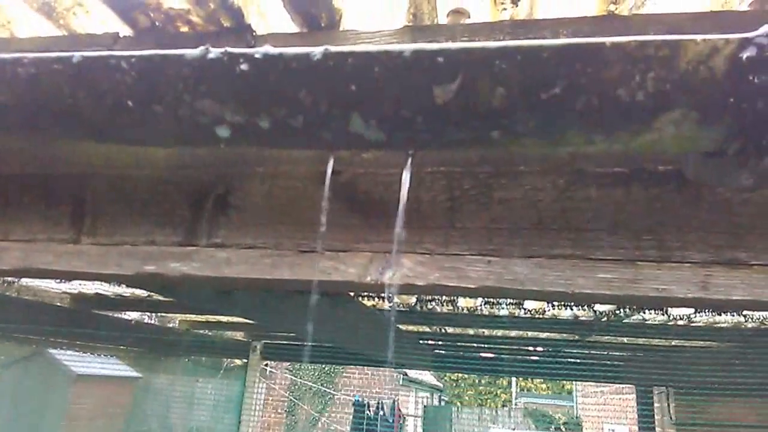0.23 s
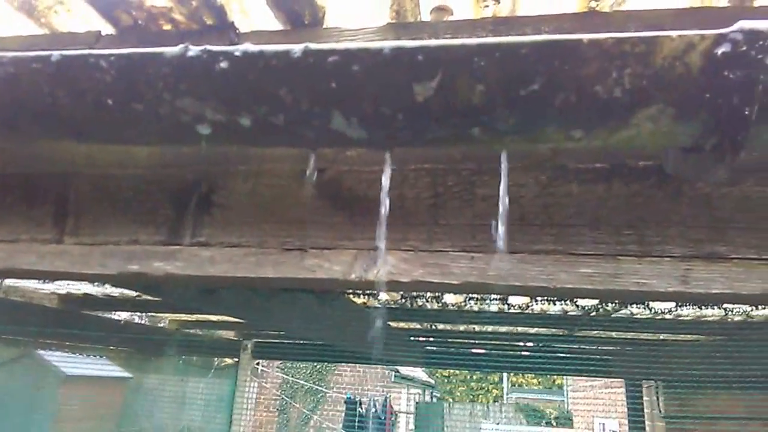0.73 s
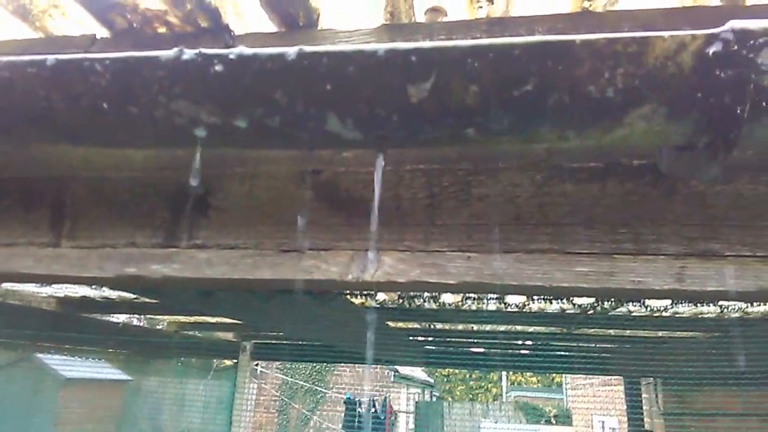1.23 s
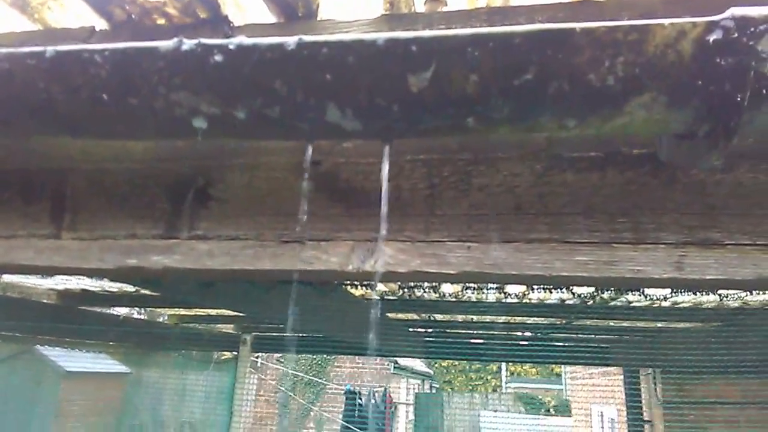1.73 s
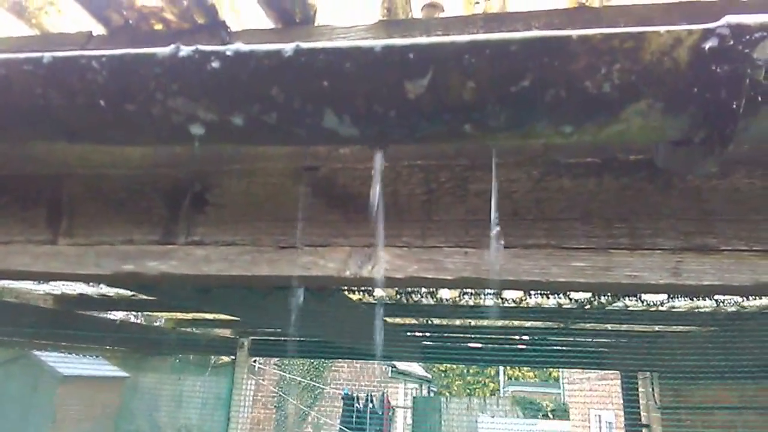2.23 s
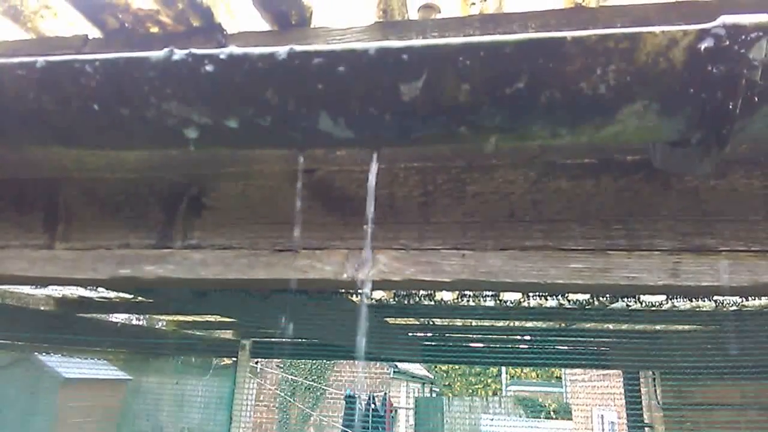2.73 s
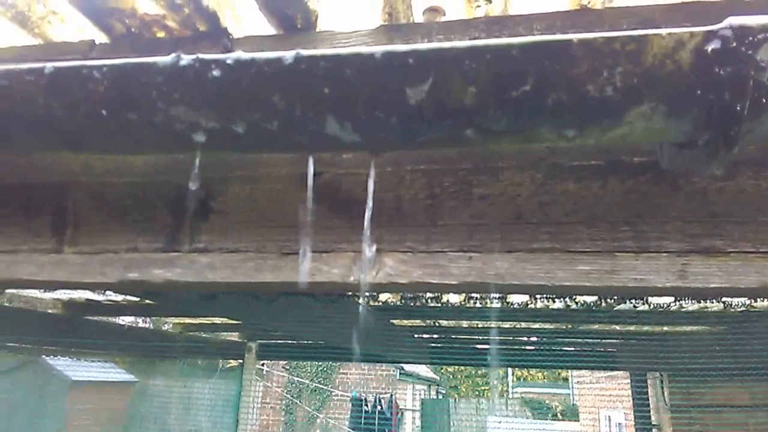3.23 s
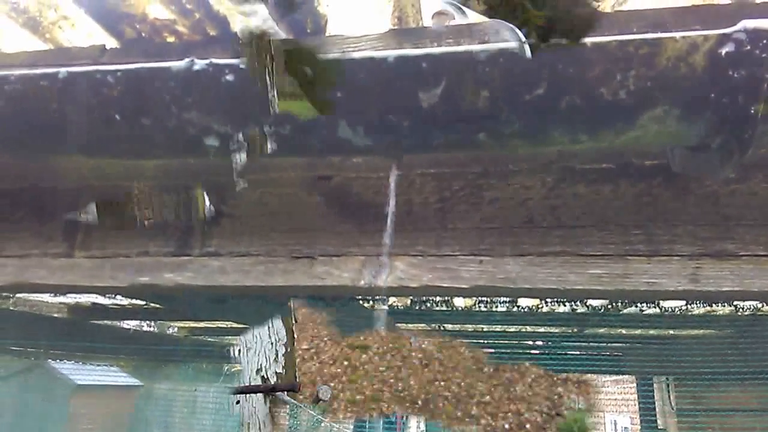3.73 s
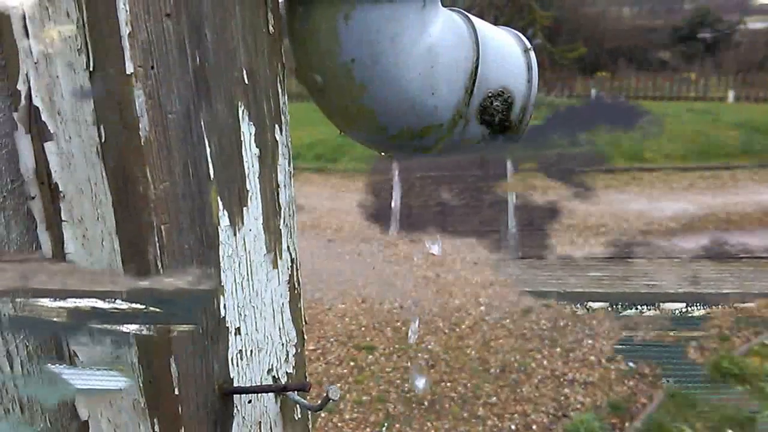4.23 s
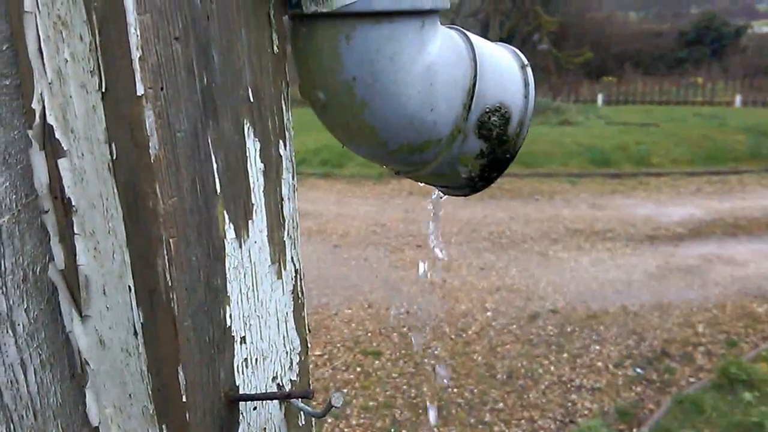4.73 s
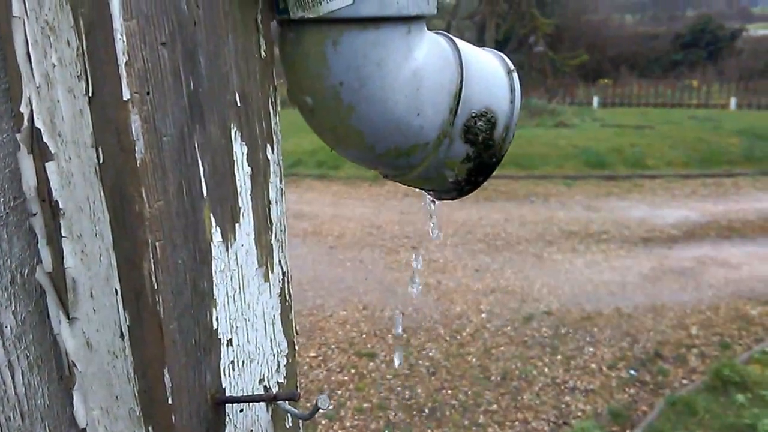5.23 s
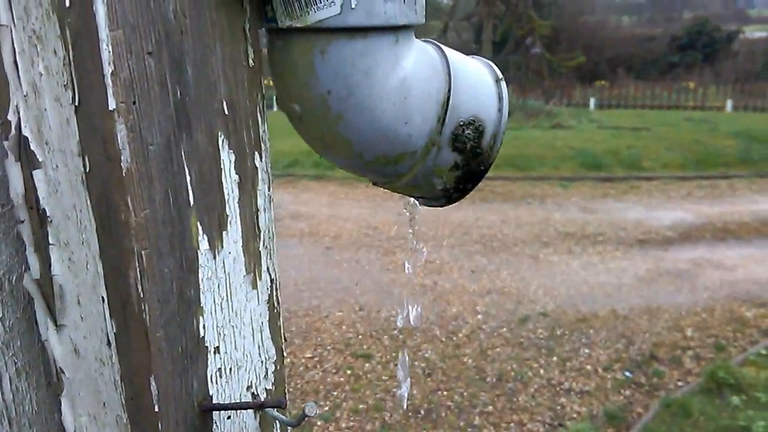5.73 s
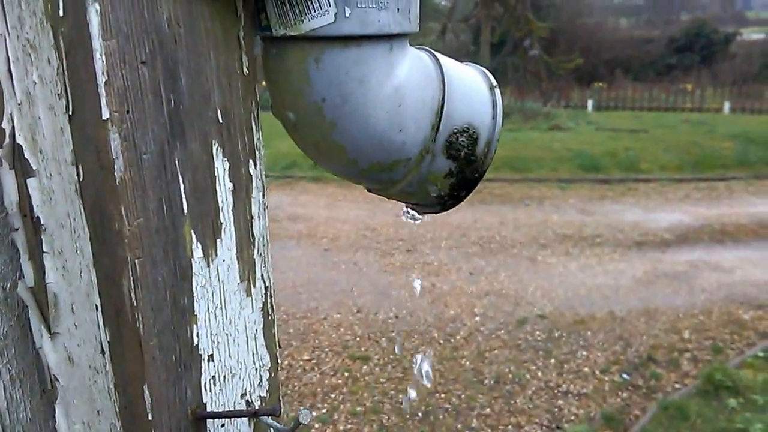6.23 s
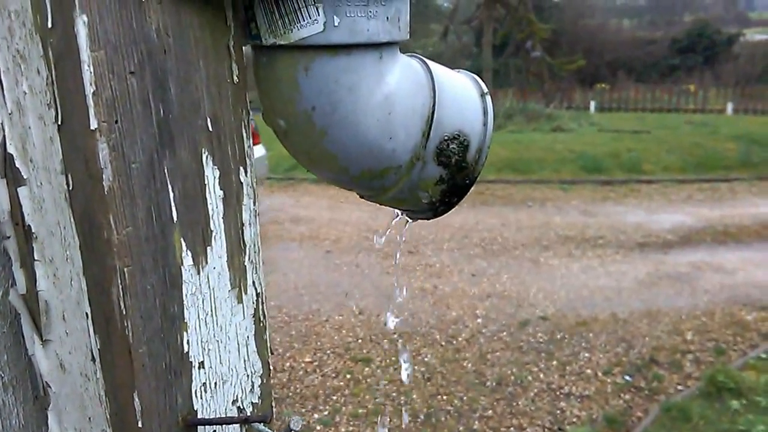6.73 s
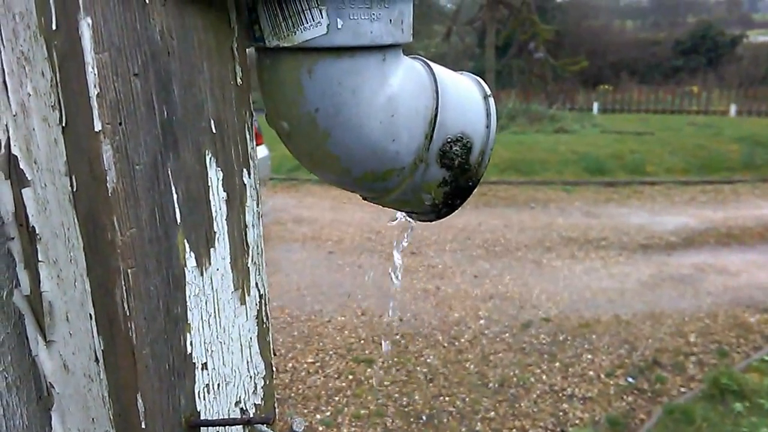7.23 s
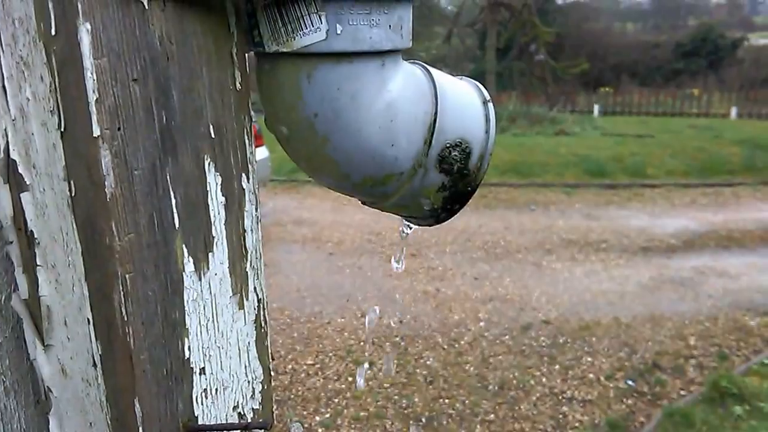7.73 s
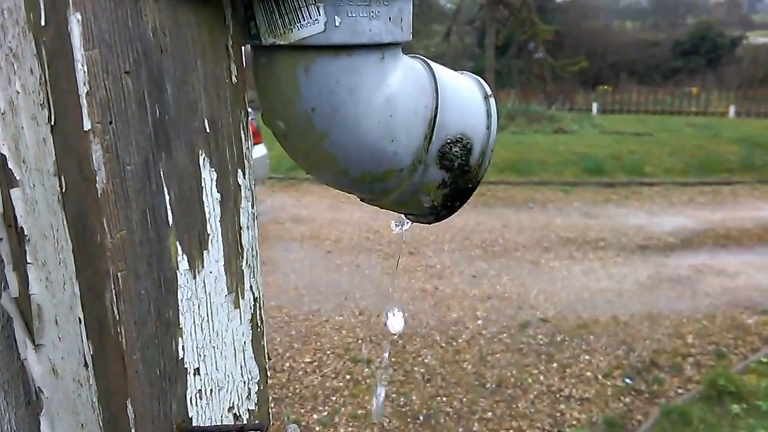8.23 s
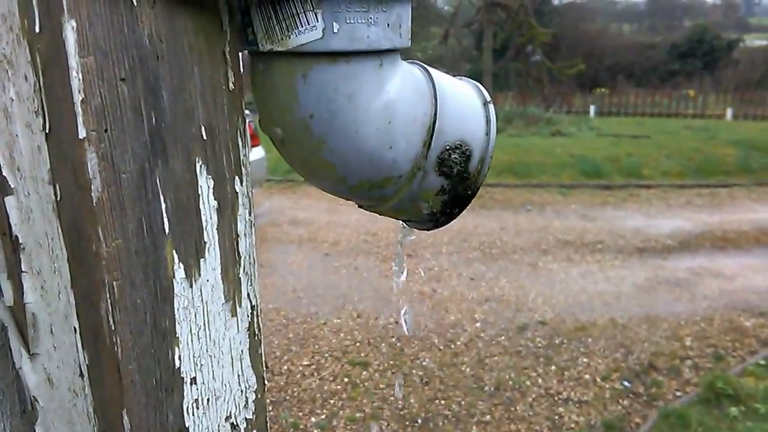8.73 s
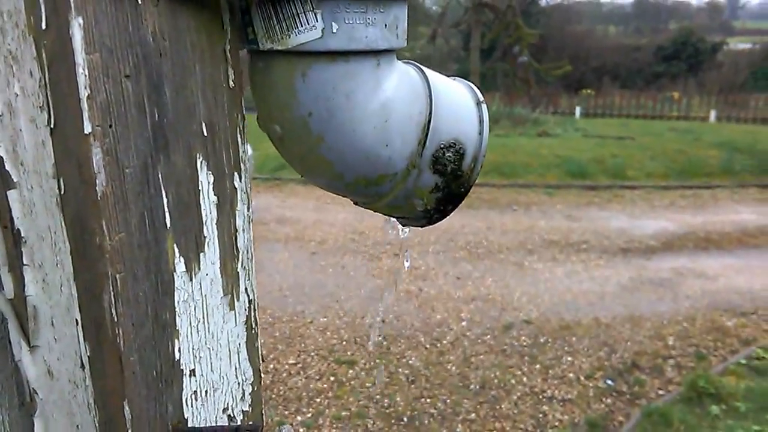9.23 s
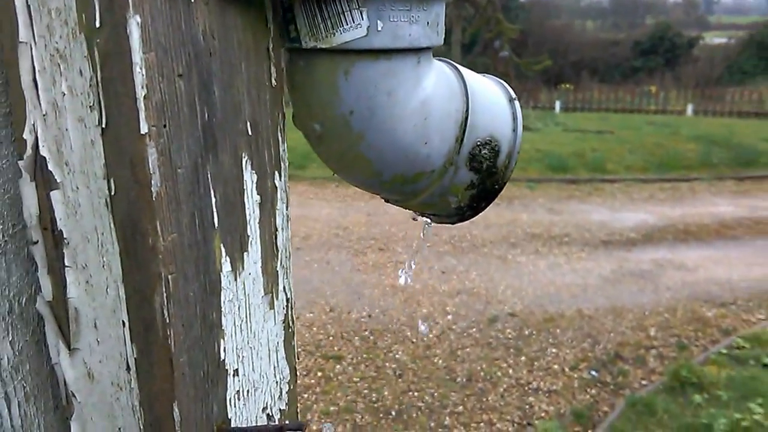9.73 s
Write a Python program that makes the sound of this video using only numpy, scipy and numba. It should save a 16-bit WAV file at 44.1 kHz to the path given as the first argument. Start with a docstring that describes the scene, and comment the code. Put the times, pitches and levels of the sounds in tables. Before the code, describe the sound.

Sound fades in at about 0.15 s: drops from a roof edge hit wet ground close by, with rapid, bright ticks, small rounded plops rising in pitch and fine patter over soft rain hiss and low rumble. The background thins after 1.6 s. A very faint, echoed bird song passes at 1.8-2.8 s. Two sharp, loud drops snap at 2.9 and 3.0 s with a short low flutter. It fades out by 3.95 s; silence until 4.5 s. Then a downpipe dribbles onto gravel, sparser and quieter, with short, slapping plops and crisp spray near 6.8 and 7.1 s. From 5.7 to 6.9 s a small bird gives a thin whistle and seven quick, high hooked notes with tree echoes, starting again near 9.7 s. Dull handling knocks fall around 6.6-7.1 and 9.7-9.8 s; a faint far hum swells after 9 s. Handheld stereo microphone, ticks left, top hiss right.

```python
"""Under a roof edge in the rain, thin strings of water tick and plop on wet ground: damped rings and noise bursts.
After a short silence a downpipe dribbles onto gravel, where plops ring shorter and slap harder.
Behind both, flickering noise bands make distant rain over a low rumble, with small random drops on top.
A small bird sings gliding whistles echoed by the trees; dull knocks, a low flutter and a far hum pass by.
The left microphone port is bright near 5 kHz, the right one in the top treble."""
import sys
import numpy as np
from scipy import signal
from scipy.fft import irfft, next_fast_len
from scipy.io import wavfile
from scipy.ndimage import uniform_filter1d
from numba import njit

SR = 44100
rng = np.random.default_rng(int(sys.argv[2]) if len(sys.argv) > 2 else 0)


def store_wav(level_fs):
    """Save 16-bit WAV to argv[1]."""
    pcm = np.round(np.clip(np.atleast_2d(level_fs), -1, 1) * 32767)
    wavfile.write(sys.argv[1], SR, pcm.T.astype(np.int16))


N = 439677

# Drops that snap on the ground: start_s, level_db, pitch_hz, treble spray_db
SNAPPING_DROPS = [(0.1798, -41, 5200, -67), (0.316, -33, 5530, -46), (0.4121, -26, 6250, -38.5),
                  (0.4406, -23, 5000, -45), (0.468, -21, 5350, -38.5), (0.579, -27.5, 4460, -59),
                  (0.5933, -21.5, 5280, -40), (0.7139, -26.5, 5360, -41), (0.767, -27, 2790, -49),
                  (0.8056, -23.5, 5070, -47), (0.8517, -36, 4700, -79), (0.911, -29.5, 6440, -47),
                  (0.9965, -28, 3900, -73), (1.051, -23, 4760, -41.5), (1.066, -34, 5460, -49),
                  (1.1076, -25, 5540, -52), (1.2024, -24.5, 5420, -44), (1.2453, -29, 4700, -48),
                  (1.3475, -27.5, 5370, -40), (1.4, -33.5, 5700, -52), (1.438, -26, 5170, -47),
                  (1.751, -30.5, 4580, -48), (1.7871, -28.5, 5830, -41), (1.805, -28.5, 6060, -42),
                  (1.855, -31.5, 4950, -52), (1.898, -36, 4520, -51), (1.929, -38, 6840, -45.5),
                  (1.983, -33.5, 5970, -45), (2.128, -25.5, 5250, -46), (2.2469, -20.5, 6100, -38.5),
                  (2.334, -37, 5260, -49), (2.429, -29.5, 6000, -58), (2.5321, -25, 5500, -44),
                  (2.599, -29, 6500, -44), (2.721, -30.5, 6060, -54), (2.832, -33.5, 6150, -64),
                  (2.916, -9.5, 4960, -39), (2.941, -27.5, 5030, -47), (3.0022, -15, 4950, -41),
                  (3.1073, -33.5, 5066, -71), (3.172, -41, 5070, -65), (3.2332, -28.5, 5600, -43),
                  (3.2987, -34.5, 6300, -43.5), (3.365, -24, 4650, -58), (3.53, -30, 5270, -41),
                  (3.566, -31.5, 5640, -49), (3.7293, -30.5, 5460, -47.5), (3.86, -37.5, 6060, -57),
                  (5.2225, -52, 5700, -41), (5.6468, -40, 5500, -35), (5.841, -25, 5740, -37),
                  (5.9422, -31, 4270, -39), (6.061, -44, 6450, -32), (6.7824, -24, 5570, -25.5),
                  (7.0612, -31.5, 6040, -24.5), (7.902, -42, 5740, -40.5), (7.935, -48, 6500, -38),
                  (8.393, -37, 5500, -44), (8.554, -53, 5700, -32.5), (9.22, -60, 5800, -39.5)]
# Drops that trap a bubble: start_s, level_db, pitch_hz (30 % into the glide), glide (pitch factor)
BUBBLE_DROPS = [(0.42, -33.5, 3190, 1.9), (0.507, -40, 1710, 1.5), (0.541, -38.5, 1180, 2.8),
                (0.594, -32, 1840, 1.1), (.73, -37, 830, 2.4), (0.751, -37, 1150, 2.1),
                (.764, -31, 2610, 1.6), (0.807, -39, 1640, 1.6), (.856, -42.5, 845, 1),
                (1.035, -40.5, 1110, 1.7), (1.051, -32, 1960, 1.8), (1.087, -31.5, 2820, 1.5),
                (1.137, -35.5, 1510, 1.25), (1.245, -30.5, 2350, 2.1), (1.28, -37.5, 1870, 0.86),
                (1.305, -39.5, 864, 1.55), (1.511, -43, 950, 1.9), (1.8, -36.5, 1650, 1.04),
                (1.905, -47, 557, 1.4), (2.008, -50.5, 1550, 1.04), (2.042, -41, 3080, 1.5),
                (2.056, -44, 1660, 1.2), (2.217, -38, 1570, 0.97), (2.354, -43.5, 1640, 1.4),
                (2.447, -46, 1050, 1.5), (2.481, -40, 2020, 1.4), (2.4884, -27, 1695, 2.3),
                (2.551, -42, 1760, 1.1), (2.831, -38.5, 2430, 1.3), (2.887, -43, 1620, 1),
                (2.925, -27.5, 1470, 1.3), (2.953, -38.5, 1680, 0.99), (3.092, -39, 1185, 1.54),
                (3.258, -46, 1150, 2.8), (3.466, -41.5, 1850, 2), (3.709, -46, 1500, 1.2),
                (3.727, -32, 2030, 2), (4.809, -37, 760, 2), (5.055, -40, 1060, 2), (5.181, -37, 2240, 1.2),
                (5.296, -37.5, 1510, 1.4), (5.939, -34.5, 2320, 1.7), (6.171, -34, 1310, 2.4),
                (6.312, -35.5, 630, 0.94), (7.814, -35.5, 950, 1.04), (7.935, -43, 1870, 1.7),
                (8.316, -38.5, 3030, 0.92), (8.392, -37, 2250, 1.6), (8.431, -41.5, 980, 1.5),
                (8.617, -42, 1710, 0.95), (8.639, -38, 1190, 2.4), (8.701, -40.5, 1900, 1.4),
                (8.727, -48, 1100, 2.1), (8.841, -30.5, 1420, 1.6), (8.916, -31.5, 840, 1.46)]
# Dull knocks on the hand-held microphone body: start_s, level_db, pitch_hz
BODY_KNOCKS = [(2.268, -39.5, 363), (3.89, -45, 64.5), (6.649, -41, 273), (6.906, -47, 300),
               (7.091, -32.5, 102), (9.716, -35.5, 56.5), (9.807, -38.5, 84)]
# Background levels along time: time_s, rumble_db, rain_db, top_hiss_db
BACKGROUND = [(.36, -56, -52, -58.5), (.6, -59.5, -54.5, -61), (1.55, -62, -55.5, -64),
              (1.66, -71, -65.5, -65.5), (1.8, -68.5, -64.5, -63.5), (2.75, -70, -64, -61),
              (3.45, -68.5, -63, -61.5), (3.72, -68, -69.5, -71), (4.82, -67.5, -62, -70),
              (5.4, -64.5, -61, -68), (5.9, -66, -61.5, -69), (6.05, -72, -69, -68.5),
              (7.6, -74.5, -72, -68.5), (7.9, -72.5, -67.5, -67.5), (8.8, -71, -67.5, -69),
              (9.05, -73, -71, -74.5), (9.6, -72.5, -67.5, -72.5)]
# Background colour at the roof, then at the pipe: pitch_hz, density_db (relative, per Hz)
ROOF_COLOUR = [(30, 7.5), (64, 2.5), (116, -10.5), (374, -8.5), (928, -6.5), (1200, -12), (1730, -2),
               (2770, -6.5), (5730, -9.5), (13900, -27)]
PIPE_COLOUR = [(30, 8), (65, -1), (195, -12.5), (485, -9), (597, -12), (735, -11), (1200, -15), (2030, -11),
               (4420, -17), (13500, -24)]
# Microphone ports: pitch_hz, roof_left_minus_right_db, pipe_left_minus_right_db, likeness (0-1)
MIC_PORTS = [(60, -1.5, -1.5, 0.7), (300, -1.5, -1.5, 0.87), (1220, 0, 0.5, 0.01), (2410, 7, 1, 0.21),
             (5150, 13.5, 9, 0.3), (7870, 1, -1, 0.01), (14500, -36.5, -26.5, 0.8)]
# Fades of each place: start_s, end_s, fade_in_s, first_db, fade_out_s, last_db
PLACE_FADES = [(0.151, 3.955, 0.38, -12, 0.24, -11.5), (4.503, 10, 0.24, -8, 0.16, -3.5)]
# Thin opening whistles of the bird: start_s, level_db
OPENING_WHISTLES = [(1.758, -59), (5.706, -54), (9.672, -60)]
# Hooked notes that follow: start_s, level_db
HOOKED_NOTES = [(2.004, -55), (2.174, -55), (2.345, -56.5), (2.514, -58), (2.7, -57.5), (5.955, -42.5),
                (6.124, -42.5), (6.288, -41.5), (6.45, -41.5), (6.627, -42.5), (6.821, -43.5), (9.901, -47)]

TIME = np.arange(N) / SR
PIPE_FROM_S = 4.2  # roof settings before this, pipe settings after
TOP_HZ, NOISE_TOP_HZ = 15500, 14300  # top of everything, top of the noise bands

PLOP_RING_S = 0.0071  # ring of a bubble that keeps its pitch in a puddle; a rising one rings longer
GRAVEL_RING = 0.33  # share of that ring left on gravel
SLAP_S = .0022

WHISTLE_HZ, WHISTLE_GLIDE_S = (8180, 7020), 0.088  # glides from the first pitch towards the second
WHISTLE_S, WHISTLE_EDGE_S = 0.15, 0.02
HOOK_HZ, HOOK_SAG_HZ_PER_S = (5540, 6760, 5253), 150  # first, top, last; the last sags through the song
HOOK_RISE_S, HOOK_FALL_S, HOOK_HOLD_S, HOOK_EDGE_S = 0.015, .046, 0.021, 0.00059
HOOK_SWELL_DB, HOOK_CURL_HZ = 2.5, 220  # the held end is louder and curls up again
FLICK_HZ, FLICK_S, FLICK_DB = (5200, 7300), .016, -12  # faint upward flick into each hooked note
TREES_T60_S, TREES_DB = .23, 1.5

FLUTTER_S, FLUTTER_EDGE_S = (2.85, 3.015), 0.045  # from and to
FLUTTER_HZ, FLUTTER_DB, FLUTTER_SAG_DB_PER_S = 54.9, -36.5, 22.5  # mean pitch, starting level, sag
HUM_S, HUM_SWELL_S, HUM_DB = 9.05, 0.45, -63.5


def undb(db):
    """Gain of a level in dB."""
    return 10 ** (np.asarray(db, float) / 20)


def unit(x):
    """Scale to rms 1."""
    return x / np.sqrt(np.mean(x ** 2))


def curve(rows, col=1):
    """Draw a table column along time."""
    rows = np.array(rows, float)
    return np.interp(TIME, rows[:, 0], rows[:, col])


def at_pitch(rows, hz, col=1):
    """Read a table column at a pitch, on a log pitch scale."""
    rows = np.array(rows, float)
    return np.interp(np.log(hz), np.log(rows[:, 0]), rows[:, col])


def sides(pan_db):
    """Left and right gains whose mean is 1, from left minus right in dB."""
    left = 2 / (1 + undb(-np.asarray(pan_db)))
    return np.array([left, 2 - left])


def port_pan(s, hz):
    """Left minus right dB that the two ports give to a pitch at each place."""
    return np.where(s < PIPE_FROM_S, at_pitch(MIC_PORTS, hz, 1), at_pitch(MIC_PORTS, hz, 2))


def swell(t, t0, t1, attack_s, release_s):
    """Gain that rises after t0, holds at 1 and falls to silence at t1."""
    return np.clip(np.minimum((t - t0) / attack_s, (t1 - t) / release_s), 0, 1)


def fade_db():
    """Level ramps in dB at both ends of each place."""
    total_db = np.zeros(N)
    for t0, t1, in_s, first_db, out_s, last_db in PLACE_FADES:
        fade_in_db = first_db * (1 - swell(TIME, t0, 99, in_s, 1))
        fade_out_db = last_db * (1 - swell(TIME, -1, t1, 1, out_s))
        total_db += np.where((TIME >= t0) & (TIME < t1), fade_in_db + fade_out_db, 0)
    return total_db


def band(lo_hz, hi_hz, edge=0.068):
    """Random-phase noise band with soft edges, rms 1, unrelated between the two channels."""
    size = next_fast_len(N)
    hz = np.arange(size // 2 + 1) * SR / size
    inside = np.log(np.minimum(hz / lo_hz, hi_hz / (hz + 1)) + 1e-9)
    shape = np.sin(np.pi / 2 * np.clip(inside / edge + .5, 0, 1)) * (hz < NOISE_TOP_HZ)
    used = shape > 0
    spectrum = np.zeros((2, len(hz)), complex)
    spectrum[:, used] = shape[used] * np.exp(2j * np.pi * rng.random((2, used.sum())))
    return unit(irfft(spectrum, size)[:, :N])


def walk(rate):
    """Random levels around 0, a new one every 1 / rate s, joined by straight slews."""
    k = int(SR / rate)
    held = np.repeat(rng.standard_normal(N // k + 1), k)
    return 2.0 * uniform_filter1d(held, k)[:N]


@njit
def ring(n, start, step, decay, rise, glide, gain):
    """Damped sines with a soft start, gliding while strong; start and gain have a row per channel."""
    out = np.zeros((2, n))
    for k in range(len(step)):
        for c in range(2):
            fall, grow, phase = 1., 1., 0.
            w, i = step[k], start[c, k]
            while fall > 3e-3 and i < n:
                out[c, i] += gain[c, k] * fall * (1 - grow) * np.sin(phase)
                phase += w
                if fall > .12:
                    w *= glide[k]
                fall *= decay[k]
                grow *= rise[k]
                i += 1
    return out


def grains(s, db, hz, cycles, glide, pan_db, lag=6, rise=15.0):
    """Rings that last some cycles and glide by a factor in that time; the left port hears them a little late."""
    span = cycles * SR / hz  # samples
    start = np.clip(np.array([s * SR + lag, s * SR]), 0, N).astype(np.int64)
    gain = 2 * undb(db) * sides(pan_db)
    return ring(N, start, 2 * np.pi * hz / SR, np.exp(-2 / span), np.exp(-rise / span), glide ** (1 / span), gain)


def bursts(s, db, tau_s, rise_s=0.00073):
    """Envelope that leaps at each time and dies away."""
    kicks = np.bincount(np.minimum(s * SR, N - 1).astype(int), undb(db), N)
    lag = np.exp(-1 / (rise_s * SR))
    decaying = signal.lfilter([1], [1, -np.exp(-1 / (tau_s * SR))], kicks)
    return signal.lfilter([1 - lag], [1, -lag], decaying)


def spatter(count, roof_db, pipe_db, spread_db, tau_s):
    """Gain that leaps with each small splash and sinks back to 1."""
    luck = rng.random((count, 2)).T
    s = luck[0] * N / SR
    size_db = np.minimum(-spread_db * np.log(luck[1]), 3 * spread_db)
    return 1 + bursts(s, np.where(s < PIPE_FROM_S, roof_db, pipe_db) + size_db, tau_s)


def distant_rain():
    """Rain and rumble in half-octave noise bands that flicker alone; splashes lift neighbouring bands together."""
    zones = np.zeros((3, 2, N))  # rumble, rain, top hiss
    roof = TIME < PIPE_FROM_S
    cut = roof.sum()
    for k, hz in enumerate(36 * 2 ** np.arange(0, 9, .5)):
        if k % 2 == 0 and hz < 10000:  # fresh splashes each octave
            splash = spatter(count=400, roof_db=1.5, pipe_db=-2.5, spread_db=4.0, tau_s=0.0048)
        flicker = np.exp(np.where(roof, .17, .07) * walk(14))
        mid, side = band(hz / 2 ** .25, hz * 2 ** .25, edge=.3) * flicker
        # the more alike the ports, the less side signal
        alike = np.clip(at_pitch(MIC_PORTS, hz, 3), 0, 1)
        pair = np.sqrt(1 + alike) * mid + np.sqrt(1 - alike) * side * np.array([[1], [-1]])
        pair[:, :cut] *= sides(port_pan(0, hz))[:, None] * undb(at_pitch(ROOF_COLOUR, hz))
        pair[:, cut:] *= sides(port_pan(PIPE_FROM_S, hz))[:, None] * undb(at_pitch(PIPE_COLOUR, hz))
        zone = int(hz > 220) + int(hz > 7600)
        # bandwidth grows with pitch, hence the root
        zones[zone] += np.sqrt(hz) * pair * (splash if hz > 220 else 1)
    out = 0
    for k, (roof_db, pipe_db) in enumerate([(2.9, 9.4), (4.96, 8.97), (4.0, 7.15)]):
        roof_gain = undb(roof_db) / zones[k][:, :cut].std()
        pipe_gain = undb(pipe_db) / zones[k][:, cut:].std()
        out = out + zones[k] * np.where(roof, roof_gain, pipe_gain) * undb(curve(BACKGROUND, k + 1))
    return out * undb(fade_db())


def patter(count, lo_hz, hi_hz, cycles, roof_db, pipe_db, spread_db, col, glide=1.15):
    """Small ringing drops at random moments, few large among many small, following the background level."""
    luck = rng.random((count, 4)).T
    s = luck[0] * (N - 1) / SR
    hz = lo_hz * (hi_hz / lo_hz) ** luck[1]
    at = (s * SR).astype(int)
    db = curve(BACKGROUND, col)[at] + fade_db()[at] + np.where(s < PIPE_FROM_S, roof_db, pipe_db)
    size_db = np.minimum(-spread_db * np.log(luck[2]), 3 * spread_db)
    pan_db = port_pan(s, hz) + 10. * (luck[3] - .5)
    return grains(s, db + size_db, hz, cycles, 1 + (glide - 1) * 2 * luck[3], pan_db)


def small_drops():
    """Three sizes of patter: mid-treble ticks, low blips that glide up more, and top-treble specks."""
    mid = patter(count=2000, lo_hz=3540, hi_hz=6570, cycles=15.0, roof_db=0.0, pipe_db=-4.0,
                 spread_db=6.5, col=2)
    low = patter(count=1000, lo_hz=747, hi_hz=3270, cycles=5.0, roof_db=-5.0, pipe_db=-2.5,
                 spread_db=4.5, col=2, glide=1.56)
    top = patter(count=900, lo_hz=7500, hi_hz=12800, cycles=2.0, roof_db=-7.0, pipe_db=-6.5,
                 spread_db=11.0, col=3)
    return mid + low + top


def ticks():
    """A drop touches wet ground and snaps, a bounce rings nearby in pitch, and crackling spray falls after."""
    s, db, hz, spray_db = np.transpose(SNAPPING_DROPS)
    luck = rng.random((len(s), 3)).T
    roof = s < PIPE_FROM_S
    pan_db = np.where(roof, 13.5, 6.0)
    touch = grains(s - .0004, db - 8.0, hz, 2.4, 0.41, pan_db)
    snap = grains(s + .0005, db + 4.5, 1.06 * hz, 6.2, .88, pan_db, rise=4.0)
    bounce_s = s + .002 + .002 * luck[0]
    bounce_hz = hz * (.75 + .45 * luck[2])
    bounce = grains(bounce_s, db - 7 - 6 * luck[1], bounce_hz, 8.0, .95, pan_db - 4)

    crackle = undb(3.2 * walk(450))
    sizzle = grains(s, spray_db - 1.5, 12500 + 0 * s, 0.41, 1.01, np.where(roof, -10.0, -15.0))
    spray = bursts(s, spray_db + np.where(roof, 5.0, -1.5), 0.0008)
    spray += crackle * bursts(s, spray_db - np.where(roof, 8.0, 21.0), 0.00924)
    spray_sides = np.where(TIME < PIPE_FROM_S, sides(-16.0)[:, None], sides(-20.0)[:, None])
    spray = spray * band(7800, 17000, edge=0.56) * spray_sides

    body = bursts(s, db - 15.5, 0.0031)
    body += crackle * bursts(s, 0.88 * db - np.where(roof, 31.0, 40.0), 0.033)
    body = body * band(4000, 6900, edge=0.78) * sides(14.0)[:, None]
    low = bursts(s, db - 19.5, 0.0025) * band(1200, 3500, edge=0.52)
    return touch + snap + bounce + sizzle + spray + body + low


def plops():
    """Bubbles ring, most rising in pitch as they near the surface; gravel slaps harder than a puddle."""
    s, db, hz, glide = np.transpose(BUBBLE_DROPS)
    roof = s < PIPE_FROM_S
    ring_s = PLOP_RING_S * np.where(roof, 1, GRAVEL_RING)
    bubbles = grains(s, db, hz / glide ** .3, hz * ring_s, glide, port_pan(s, hz), rise=3.47)
    bubbles *= undb(1.5 * walk(700))  # the rim of the splash roughens the ring
    slap_db = db - np.where(roof, 11.0, 1.5)
    slap_db += 8.2 * np.log2(np.minimum(hz / 1400, 1))  # deep drops land softly
    slap = bursts(s, slap_db, SLAP_S) + bursts(s, slap_db - 14.5, 0.021)
    return bubbles + slap * band(500, 4000, edge=0.68)


def opening_whistle():
    """Pitch and gain of a thin whistle that settles downwards."""
    t = np.arange(int(WHISTLE_S * SR)) / SR
    high, low = WHISTLE_HZ
    hz = low + (high - low) * np.exp(-t / WHISTLE_GLIDE_S)
    return hz, swell(t, 0, WHISTLE_S, WHISTLE_EDGE_S, WHISTLE_EDGE_S)


def hooked_note(sung_s):
    """Pitch and gain of a hooked note: quick rise, rounded fall, a held end that is louder."""
    first, top, last = HOOK_HZ
    length = HOOK_RISE_S + HOOK_FALL_S + HOOK_HOLD_S
    t = np.arange(int(length * SR)) / SR
    rise = np.sin(np.pi / 2 * np.clip(t / HOOK_RISE_S, 0, 1))
    fall = .5 - .5 * np.cos(np.pi * np.clip((t - HOOK_RISE_S) / HOOK_FALL_S, 0, 1))
    hz = first + (top - first) * rise - (top - last + HOOK_SAG_HZ_PER_S * sung_s) * fall
    hz = hz + HOOK_CURL_HZ * np.clip(1 - (length - t) / HOOK_HOLD_S, 0, 1) ** 2
    gain = swell(t, 0, length, HOOK_EDGE_S, HOOK_EDGE_S) * undb(HOOK_SWELL_DB * (fall - 2.0))
    return hz, gain


def flick():
    """Pitch and gain of the faint upward flick."""
    x = np.linspace(0, 1, int(FLICK_S * SR))
    hz = FLICK_HZ[0] + (FLICK_HZ[1] - FLICK_HZ[0]) * np.sin(np.pi / 2 * x)
    return hz, np.sin(np.pi * x) * undb(FLICK_DB)


def tree_echoes(song):
    """Trees return dense echoes: the song convolved with noise that builds up and dies away."""
    t = np.arange(SR // 2) / SR
    tail = rng.standard_normal((2, len(t))) * undb(-60 * t / TREES_T60_S) * np.minimum(t / 0.011, 1)
    tail = tail / np.sqrt(np.sum(tail ** 2, axis=1, keepdims=True))
    return undb(TREES_DB) * signal.fftconvolve(song, tail, axes=1)[:, :N]


def bird():
    """Pure whistles that slide in pitch; only their echoes from the trees reach under the roof."""
    song = np.zeros((2, N + SR))
    waver = undb(1.55 * walk(120))  # the little throat never holds its level
    notes = [(s, db, 1.5, opening_whistle()) for s, db in OPENING_WHISTLES]
    for s, db in HOOKED_NOTES:
        song_start_s = max(s0 for s0, _ in OPENING_WHISTLES if s0 < s)
        notes.append((s, db, 9.5, hooked_note(s - song_start_s)))
        notes.append((s - FLICK_S / 2, db, 9.5, flick()))
    for s, db, pan_db, (hz, gain) in notes:
        at = int(s * SR)
        level = np.sqrt(2) * undb(db) * gain * waver[at - len(hz):at]
        tone = level * np.sin(2 * np.pi * np.cumsum(hz) / SR)
        song[:, at:at + len(hz)] += sides(pan_db)[:, None] * tone
    direct = np.where(TIME < PIPE_FROM_S, 0, 1)
    return direct * song[:, :N] + tree_echoes(song)


def knocks():
    """Dull damped thuds of the hand-held body, each starting with a tap that is stronger on deep ones."""
    s, db, hz = np.transpose(BODY_KNOCKS)
    thud = grains(s, db, hz, 0.0033 * hz, 1.0, 0 * s)
    tap = grains(s, db - np.where(hz < 150, 3.0, 20), 600 + 0 * s, 0.67, 0.56, 0 * s)
    return thud + tap


def flutter():
    """A short low tone with two overtones, unsteady in pitch and level."""
    phase = 2 * np.pi * np.cumsum(FLUTTER_HZ * (1 + 0.13 * walk(40))) / SR
    tone = np.sin(phase) + 0.37 * np.sin(2 * phase + 1) + 0.21 * np.sin(3 * phase)
    level_db = FLUTTER_DB - FLUTTER_SAG_DB_PER_S * (TIME - FLUTTER_S[0]) + 2.5 * walk(50)
    return tone * undb(level_db) * swell(TIME, *FLUTTER_S, FLUTTER_EDGE_S, FLUTTER_EDGE_S)


def far_hum():
    """A far hum that swells and stays: a narrow noise band in the middle and a wider one at the sides."""
    hum = band(250, 366, edge=.3)[0] + 0.96 * band(306, 910)
    return hum * undb(HUM_DB) * swell(TIME, HUM_S, 99, HUM_SWELL_S, 1)


def scene():
    """The roof edge, then the downpipe."""
    rain = distant_rain() + small_drops()
    drips = ticks() + plops()
    return rain + drips + bird() + knocks() + flutter() + far_hum()


def record(dry):
    """Bass roll-off of the microphone, silence outside the two places, steep cut at the top."""
    out = signal.sosfilt(signal.butter(5, 47, "high", fs=SR, output="sos"), dry)
    out = out * sum(swell(TIME, t0, t1, 0.03, 0.012) for t0, t1, *_ in PLACE_FADES)
    return signal.sosfilt(signal.ellip(8, .2, 80, TOP_HZ, fs=SR, output="sos"), out)


dry = scene()
out = record(dry)
store_wav(out)
```